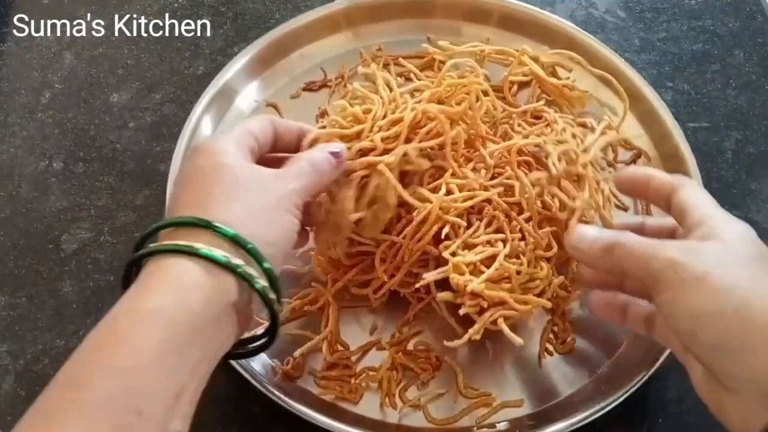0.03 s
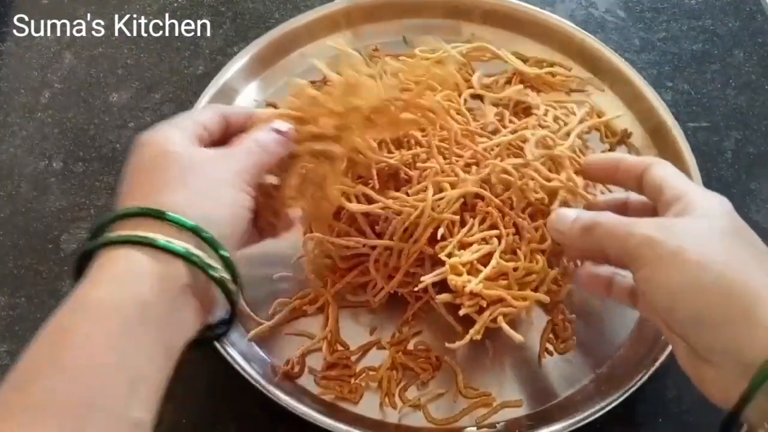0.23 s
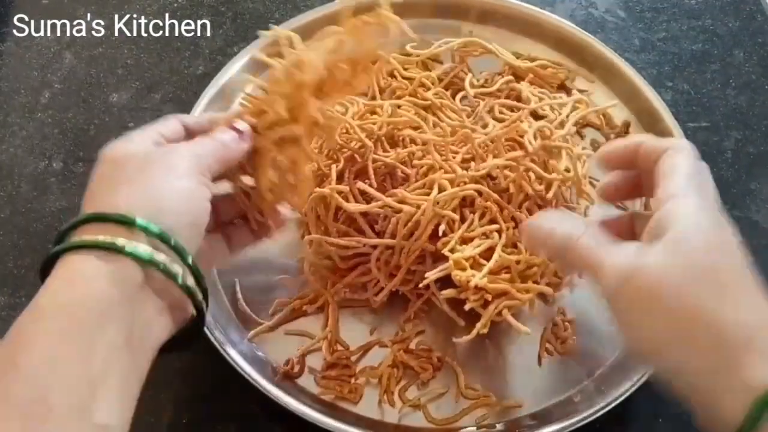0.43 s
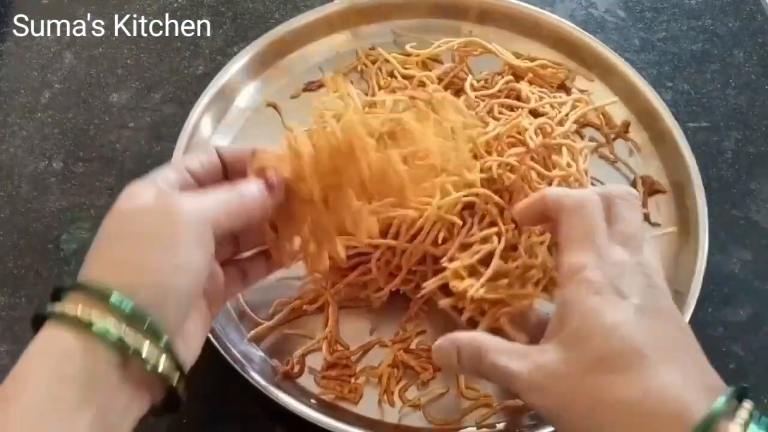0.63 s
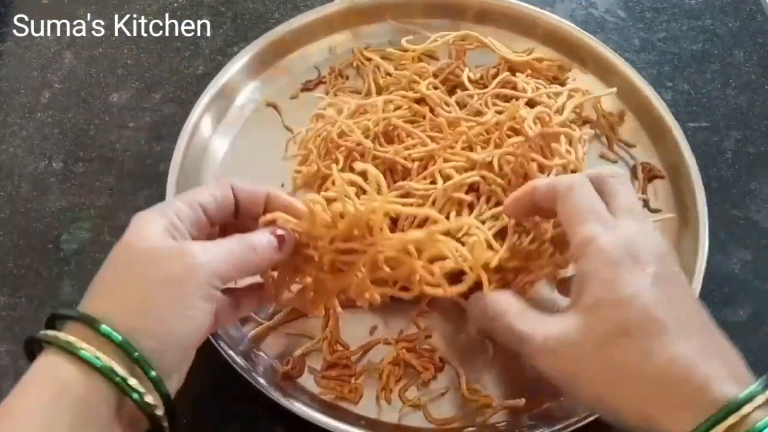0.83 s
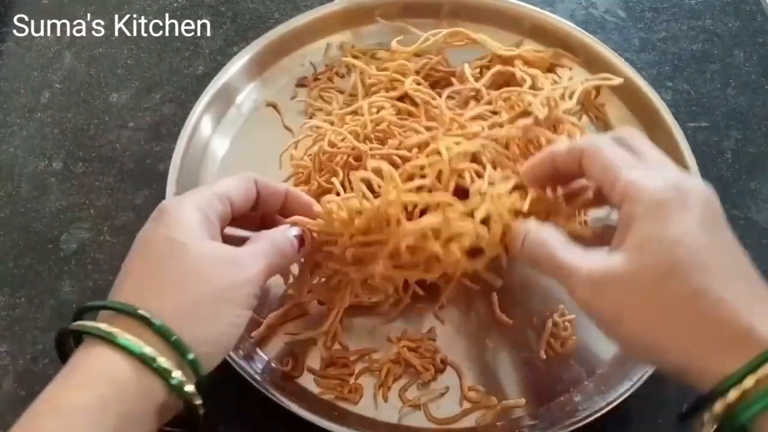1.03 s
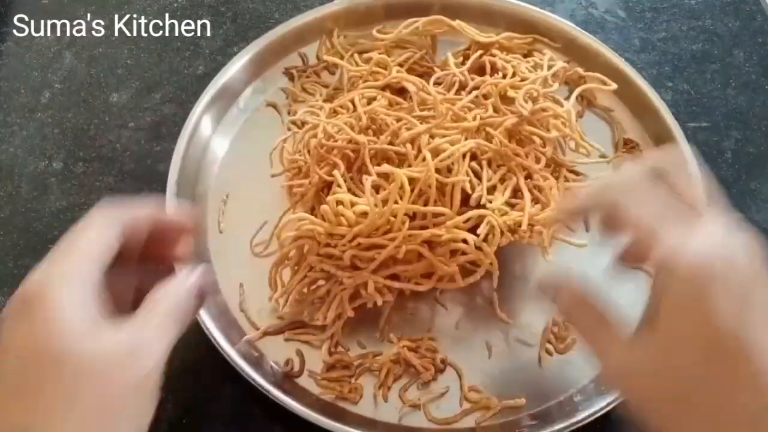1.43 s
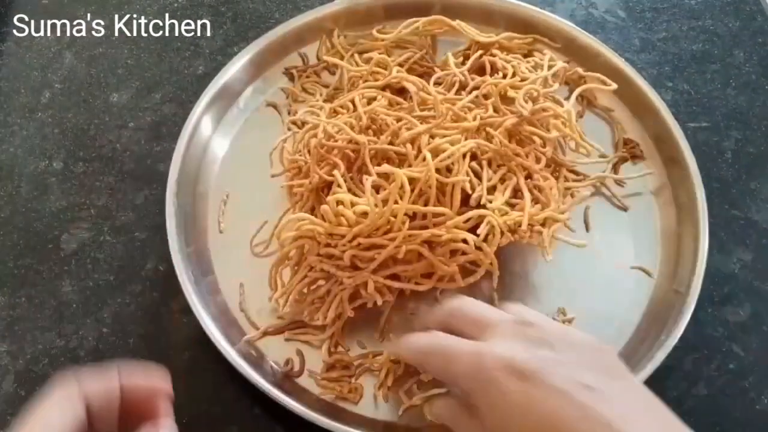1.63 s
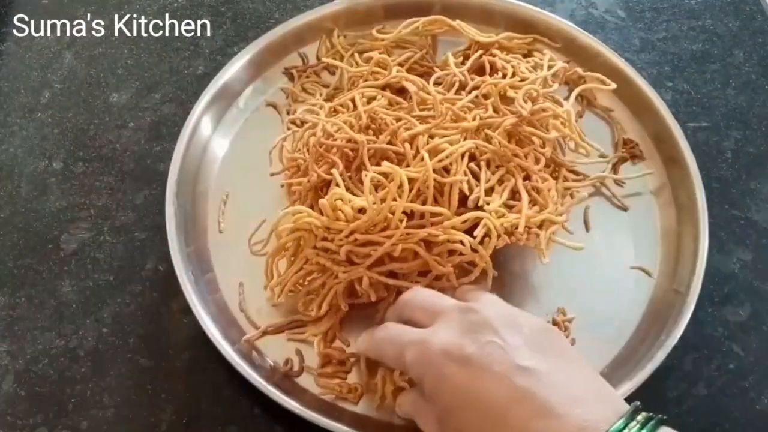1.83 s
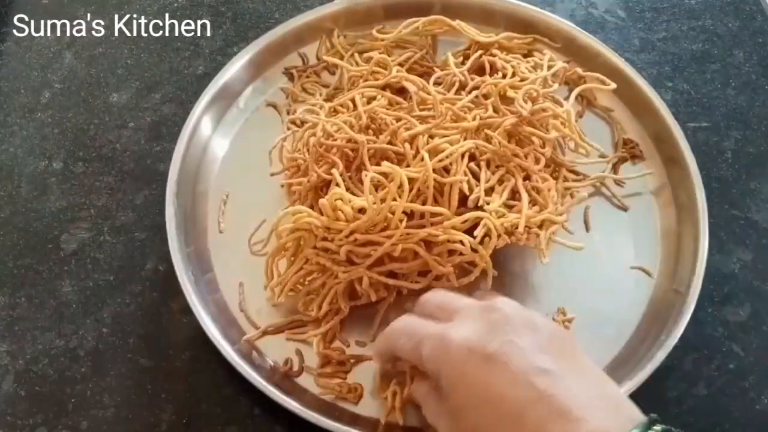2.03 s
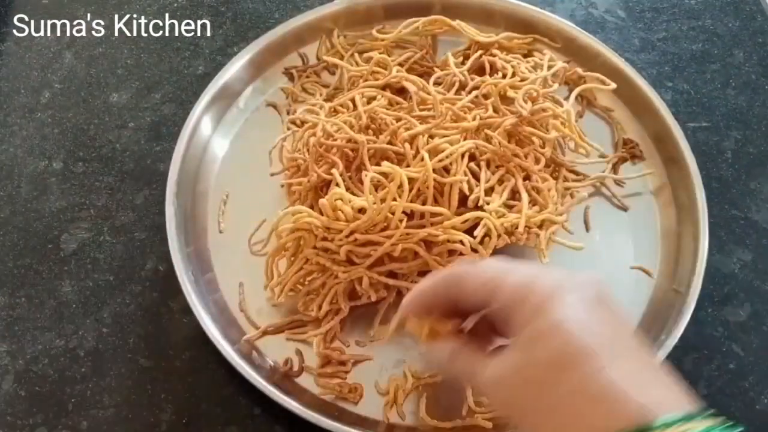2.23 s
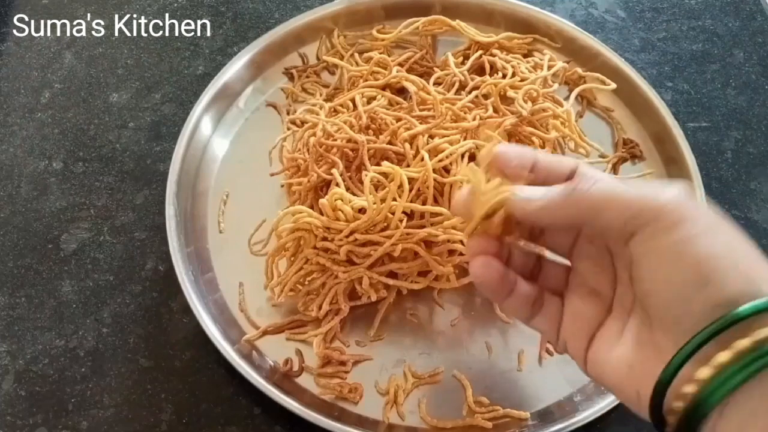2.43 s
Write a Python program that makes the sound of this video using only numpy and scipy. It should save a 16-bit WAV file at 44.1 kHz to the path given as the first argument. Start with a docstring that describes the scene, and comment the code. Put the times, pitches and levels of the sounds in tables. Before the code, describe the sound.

Glass bangles clink as hands turn crackling fried noodles on a steel plate.

```python
"""Crisp noodles and glass bangles

Close to the microphone in a small kitchen, two hands turn over fried noodles on a steel plate.
Glass bangles on the wrists knock together and ring; the strands snap, rustle and crackle.
The plate pings and gives a low rumble as the heap is set down. Faint room tone lies behind."""
import sys
import numpy as np
from scipy import signal
from scipy.fft import rfft, irfft
from scipy.io import wavfile

SR = 44100
rng = np.random.default_rng(int(sys.argv[2]) if len(sys.argv) > 2 else 0)


def master_out(mix):
    """Clip the mix to full scale and print it as 16-bit PCM to the path in sys.argv[1]."""
    frames = np.transpose(np.atleast_2d(mix))
    ceiling = np.clip(frames, -1, 1)
    pcm = np.round(ceiling * 32767).astype(np.int16)
    wavfile.write(sys.argv[1], SR, pcm)


N = 110250

# Partials of the three kinds of bangle: pitch_hz
THIN_HZ = [1689, 4230, 4831, 5150, 6240, 6545, 6760, 9206, 10020, 11890, 13480, 14750, 14826, 15396]
MIDDLE_HZ = [6340, 6222, 6741, 10010, 11880, 12350, 13430, 14610, 15340]
THICK_HZ = [2196, 2326, 3128, 4199, 6126, 6741, 9814, 11864, 12331, 13420, 14620, 15380]
# How those partials ring, in the same order: level_db, t60_s (each knock scales both)
THIN_RING = [(-26.5, 0.14), (-29.5, .12), (-19.5, .15), (-25, 0.13), (-14.5, 0.27), (-9, 0.047),
             (-30, 0.13), (-20.5, 0.17), (-26, 0.21), (-13.5, 0.084), (-21.5, .09), (2, 0.064),
             (-3.5, 0.057), (1.5, 0.1)]
MIDDLE_RING = [(-21, 0.058), (-15.5, 0.11), (-19, 0.083), (-15.5, 0.12), (0.5, 0.074), (-8, 0.18),
               (-25, .1), (-2, 0.19), (-12.5, 0.091)]
THICK_RING = [(-31, 0.22), (-37.5, 0.68), (-49.5, .2), (-25, 0.28), (-11.5, 0.06), (-25.5, 0.37),
              (-15, .11), (-1, .085), (4.5, 0.12), (-15.5, .085), (-8.5, 0.19), (-23, .1)]
# How much each kind of bangle chatters: kind, gain_db
LOOSENESS_DB = {"thin": 3, "middle": 1, "thick": -6.5}
# Spectrum of glass chattering on glass: frequency_hz, level_db
CHATTER_SPECTRUM = [(1000, -24.5), (3600, -28.5), (5000, 3), (5700, -15.5), (6600, 13), (8500, -7.5),
                    (11000, -7), (14000, -5), (15500, -19)]

def clink(kind, level_db, low_db, high_db, ring_scale):
    """A bangle knocks its neighbours, which ring weaker and slightly off pitch as the stack chatters."""
    partials = {"thin": (THIN_HZ, THIN_RING), "middle": (MIDDLE_HZ, MIDDLE_RING),
                "thick": (THICK_HZ, THICK_RING)}[kind]
    mistune, neighbour_gain, contact_s = .004, 0.32, 0.00049
    chatter_db, chatter_s, contacts_per_s, rebound_db = -14, .013, 1200, -15.5
    t = np.arange(SR // 2) / SR
    ring = np.zeros(len(t))
    for hz, (mode_db, t60) in zip(*partials):
        cycles = hz * t + rng.random()
        apart_hz = mistune * hz * rng.standard_normal(2)
        left, right = (np.cos(2 * np.pi * (cycles + offset * t)) for offset in apart_hz)
        stack = np.sqrt(2) * (np.sin(2 * np.pi * cycles) + neighbour_gain * (left - right))
        tone_db = low_db if hz < 8000 else high_db if hz > 14000 else 0
        ring += stack * amp(level_db + mode_db + tone_db) * decay(t, t60 * ring_scale)
    ring *= 1 - np.exp(-t / contact_s)
    contacts = impulses(len(t), contacts_per_s)
    settling = amp(LOOSENESS_DB[kind]) * np.exp(-t / chatter_s)
    # Each rebound rings the upper partials again.
    rebounds = band(signal.fftconvolve(contacts * settling, ring)[:len(t)], 3950, 18000)
    chatter = amp(level_db + chatter_db) * settling * colour(contacts, CHATTER_SPECTRUM)
    return ring + amp(rebound_db) * rebounds + chatter

# Knocks at the wrists: start_s, kind, level_db, low_partials_db, high_partials_db, ring_scale
BANGLE_KNOCKS = [(0.2212, "thin", -33.5, -14, -1, .8), (0.232, "thin", -26, -5, 0, 1.22),
                 (0.237, "thin", -24.5, 0.5, 3.5, 0.79), (0.2672, "thin", -36, 8.5, -2, 1.07),
                 (0.2945, "thin", -37, 12.5, 8, 0.39), (0.3117, "thin", -36.5, -12, 3, .4),
                 (0.329, "thick", -21.5, 2, 10.5, 0.91), (.441, "middle", -55, 15.5, 7, 0.61),
                 (0.5001, "middle", -32.5, 4.5, -9, 1.3), (.5105, "middle", -43, 23, 7, 1.4),
                 (0.5376, "thin", -22, -12, -5.5, 1.6), (0.5525, "thin", -27, 0, 0, 0.64),
                 (0.5611, "thin", -29, -14, 3, 0.53), (.6268, "middle", -34.5, 9, -4, 0.62),
                 (0.6384, "middle", -39.5, 24.5, 0, 0.25), (0.7142, "thin", -35, -3.5, -9, 0.73),
                 (1.0407, "thin", -40.5, -5, 0, 0.23), (1.2717, "thin", -41.5, -8, 0.5, 0.36),
                 (1.360, "thin", -59.5, 11.5, -11, 0.41), (1.711, "middle", -47.5, 14, 3.5, 0.72),
                 (1.738, "middle", -30, -21, -4, 0.25), (1.7502, "middle", -36, 11, 1, 0.54),
                 (1.7725, "thin", -36, -7, -15, 0.62), (2.1197, "middle", -40, 17, -4, 0.54),
                 (2.218, "middle", -53, 19.5, 0, 0.68), (2.4868, "middle", -43.5, 14, -8, 0.31)]

def bangles():
    """Glass bangles strike each other on both wrists, close to the microphone."""
    out = np.zeros(N)
    for start_s, *knock in BANGLE_KNOCKS:
        add(out, start_s, clink(*knock))
    return out

# Strands breaking in the hands: start_s, unused_peak_db, body_db, edge_db, treble_db
STRAND_SNAPS = [(0.2369, -16, -43.5, -38, -51), (0.2775, -19, -45.5, -34.5, -27.5),
                (0.3308, -30, -49, -32, -32), (0.5019, -19, -56.5, -39, -32),
                (1.0814, -28, -38.5, -37, -41), (1.2196, -32, -52.5, -54, -67),
                (1.5915, -35, -57, -42.5, -42), (1.6824, -42, -36, -31, -38.5),
                (1.839, -45, -52, -43.5, -59), (1.9111, -30, -58, -49, -42), (1.93, -33, -51, -41, -38),
                (1.942, -38, -50.5, -41.5, -49), (1.9858, -31, -49.5, -48, -79),
                (2.027, -28, -46, -49, -60), (2.0808, -24, -57, -35.5, -39.5),
                (2.099, -17, -54, -34.5, -38), (2.2071, -16, -50, -47.5, -49), (2.2577, -23, -52, -37, -40),
                (2.3535, -22, -38, -29, -31.5), (2.3674, -27, -54, -40, -40.5),
                (2.4379, -35, -51, -43.5, -49)]
# Body, edge and treble of a snap: low_hz, high_hz, trim_db
SNAP_BANDS = [(2270, 8300, 1), (5570, 8090, -2.5), (9460, 18000, -7)]

def snaps():
    """A brittle strand breaks in a very short burst of noise, trailed by crumbs."""
    crack_s, delay_s, crumb_db, crumb_s = 0.0018, 0.00042, -22, 0.035
    out, t = np.zeros(N), np.arange(SR // 10) / SR
    envelope = np.exp(-t / crack_s) + amp(crumb_db) * np.exp(-t / crumb_s)
    for start_s, _, *levels in STRAND_SNAPS:
        for (low_hz, high_hz, trim_db), level_db in zip(SNAP_BANDS, levels):
            burst = band(rng.standard_normal(len(t)) * envelope, low_hz, high_hz)
            burst /= burst[:SR // 200].std()  # the first 5 ms set the level
            add(out, start_s + delay_s, amp(level_db + trim_db) * burst)
    return out

# How hard the hands stir the heap: time_s, level_db
STIRRING = [(0, -62.5), (.14, -59), (.21, -53), (.3, -50.5), (.45, -58.5), (.8, -68.5), (.93, -60),
            (1.0, -48.5), (1.075, -47.5), (1.09, -36), (1.15, -51.5), (1.25, -54), (1.38, -65),
            (1.53, -84.5), (1.565, -51), (1.61, -48.5), (1.66, -59), (1.71, -46), (1.8, -51.5),
            (1.9, -50.5), (2.05, -44), (2.17, -49.5), (2.26, -47.5), (2.32, -55), (2.39, -53), (2.5, -57)]
# Dry strands at close range: frequency_hz, level_db
RUSTLE_SPECTRUM = [(200, -25), (500, -10.5), (850, -13.5), (1450, -15), (2000, -10), (2600, -3),
                   (4500, -3.5), (5900, -2.5), (7000, 0.5), (8300, -11), (9800, -18), (13000, -15.5),
                   (15000, -11), (16000, -2.5)]

def rustle():
    """Thousands of tiny fractures and dry rubbing; the top treble fades when the rustle is quiet."""
    fractures_per_s, rub_gain, scrape_db = 3500, 0.69, -11.5
    clump_s, clump_db = 0.011, 2.14
    fizz_hz, full_treble_db, fizz_db_per_db = 8000, -50, 0.34
    fractures = unit(impulses(N, fractures_per_s))
    # Strands give way in small bunches.
    clumps = unit(signal.lfilter([1], [1, -np.exp(-1 / (clump_s * SR))], rng.standard_normal(N)))
    rubbing = rub_gain * rng.standard_normal(N)
    strands = colour((fractures + rubbing) * amp(clump_db * clumps), RUSTLE_SPECTRUM)
    # Their scraping keeps the plate ringing.
    steel = amp(scrape_db) * unit(signal.fftconvolve(strands, plate_ring())[:N])
    fizz = irfft(rfft(strands) * (np.fft.rfftfreq(N, 1 / SR) > fizz_hz), N)
    stir_db = curve(STIRRING)
    fizz_gain = amp(fizz_db_per_db * np.minimum(stir_db - full_treble_db, 0))
    return amp(stir_db) * (steel + strands - fizz + fizz_gain * fizz)

# Modes of the steel plate: pitch_hz, level_db, t60_s
PLATE_MODES = [(5571, -17, .12), (6755, -14, .12), (6920, -13, .1), (7175, -12, .1), (7388, 0, .08),
               (7926, -14, .11), (8430, -19, .1), (9450, -26, .09)]

def plate_ring():
    """One contact sets the plate's high modes ringing briefly."""
    t = np.arange(SR // 2) / SR
    return sum(amp(db) * decay(t, t60) * np.sin(2 * np.pi * hz * t) for hz, db, t60 in PLATE_MODES)

# Light taps on the plate, just under the hands: start_s, level_db
PLATE_TAPS = [(2.012, -35), (2.043, -35.5), (2.081, -35)]
# The plate's rumble as the heap is set down: time_s, level_db
RUMBLE_LEVEL = [(0, -85), (.95, -76), (1.08, -62), (1.16, -60), (1.21, -53), (1.32, -54), (1.4, -64),
                (1.55, -74), (2.5, -80)]
# Spectrum of that rumble: frequency_hz, level_db
RUMBLE_SPECTRUM = [(25, -23), (58, -10), (78, 1), (105, -6.5), (160, -21), (300, -33), (800, -27),
                   (2000, -73)]

def plate():
    """The loaded steel plate pings when tapped and rumbles when pushed."""
    pings = np.zeros(N)
    for start_s, level_db in PLATE_TAPS:
        add(pings, start_s, amp(level_db) * plate_ring())
    rumble = amp(curve(RUMBLE_LEVEL)) * colour(rng.standard_normal(N), RUMBLE_SPECTRUM)
    return pings + rumble

# Decay of the small kitchen: frequency_hz, t60_s
KITCHEN_DECAY = [(300, 0.56), (3000, 0.337), (7000, 0.96), (12000, 0.36), (16000, 0.15)]

def kitchen(x, first_reflection_s=0.0055):
    """The room returns a short diffuse tail that lingers near 7 kHz and dies soonest in the top treble."""
    reflections = rng.standard_normal(SR // 2) * (np.arange(SR // 2) / SR > first_reflection_s)
    hz, t, spectra = signal.stft(reflections, SR, nperseg=256)
    spectra = spectra * decay(t, read(KITCHEN_DECAY, hz)[:, None])
    _, tail = signal.istft(spectra, SR, nperseg=256)
    return signal.fftconvolve(x, tail / np.linalg.norm(tail))[:N]

# The kitchen's background at the microphone: frequency_hz, level_db
ROOM_TONE_SPECTRUM = [(20, -25), (45, -16), (80, 3.5), (120, -1), (160, -4.5), (240, 2.5), (320, -2.5),
                      (400, -11.5), (700, -10.5), (1200, -17.5), (3000, -24.5), (6500, -37), (9000, -41),
                      (16000, -29.5)]

def room_tone(level_db=-60):
    """Faint, steady, low noise behind the hands."""
    return amp(level_db) * colour(rng.standard_normal(N), ROOM_TONE_SPECTRUM)

def amp(db):
    """Decibels to gain."""
    return 10 ** (np.asarray(db) / 20)

def unit(x):
    """Scales to rms 1."""
    return x / np.sqrt(np.mean(x ** 2) + 1e-20)

def decay(t, t60):
    """Falls 60 dB every t60 seconds."""
    return np.exp(-np.log(1000) * t / t60)

def impulses(length, per_s):
    """Clicks of either sign at random times."""
    return rng.choice([-1, 1], length) * (rng.random(length) < per_s / SR)

def read(points, hz):
    """Reads a table on a log-frequency axis."""
    table_hz, value = np.transpose(points)
    return np.interp(np.log(hz + 1), np.log(table_hz + 1), value)

def curve(points):
    """Reads a time curve at every sample."""
    return np.interp(np.arange(N) / SR, *np.transpose(points))

def colour(x, points):
    """Gives x a spectrum, at rms 1."""
    gain = amp(read(points, np.fft.rfftfreq(len(x), 1 / SR)))
    return unit(irfft(rfft(x) * gain, len(x)))

def band(x, low_hz, high_hz):
    """Causal band-pass."""
    return signal.sosfilt(signal.butter(4, [low_hz, high_hz], "band", fs=SR, output="sos"), x)

def add(mix, start_s, sound):
    """Mixes a sound in at start_s."""
    part = mix[round(start_s * SR):][:len(sound)]
    part += sound[:len(part)]

def scene():
    """Hands and plate sit close and central; a faint trace of width lies around them."""
    glass_send_db, noodle_send_db, width_db = -17.5, -16, -46.5
    glass, noodles = bangles(), snaps() + rustle()
    to_room = amp(glass_send_db) * glass + amp(noodle_send_db) * noodles
    mid = glass + noodles + plate() + kitchen(to_room) + room_tone()
    side = amp(width_db) * (kitchen(to_room) + room_tone() / 2)
    return np.array([mid + side, mid - side])

def record(dry, cutoff_hz=15650):
    """The recorder's band limit cuts the highest treble."""
    low_pass = signal.firwin(255, cutoff_hz, window=("kaiser", 8), fs=SR)
    return signal.oaconvolve(dry, low_pass[None], "same")

dry = scene()
out = record(dry)
master_out(out)
```